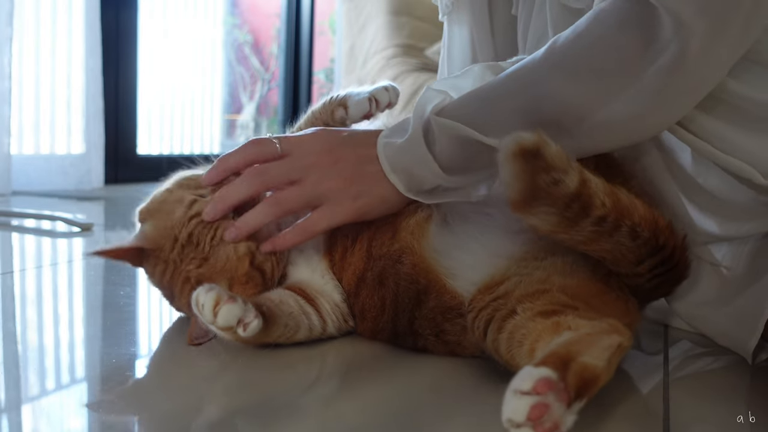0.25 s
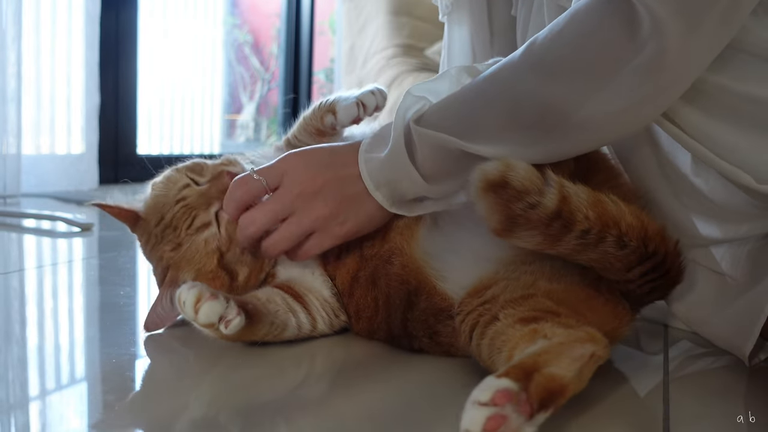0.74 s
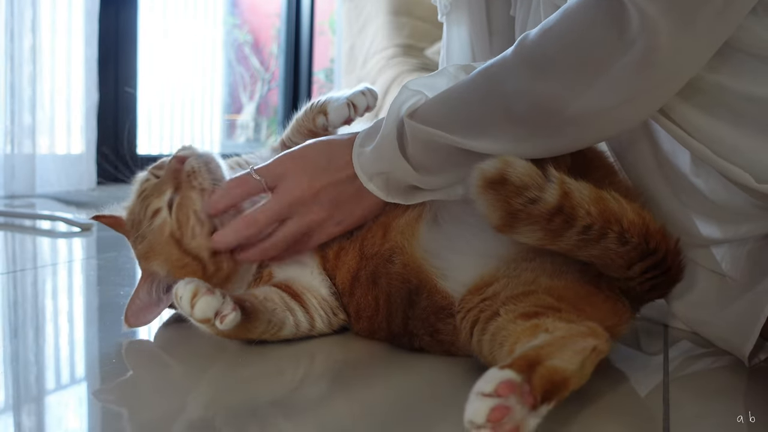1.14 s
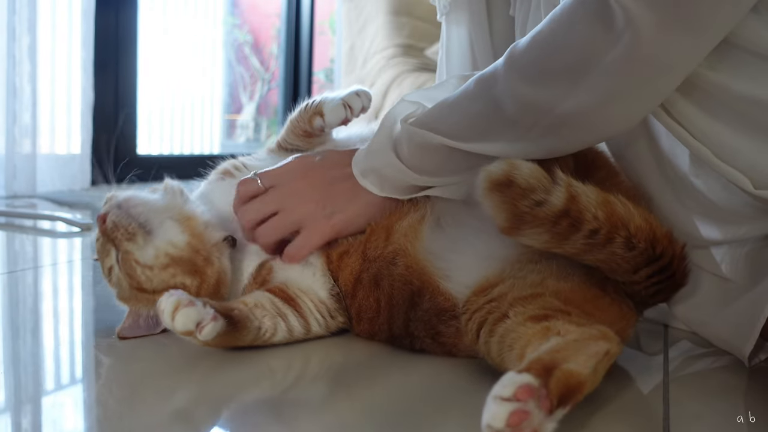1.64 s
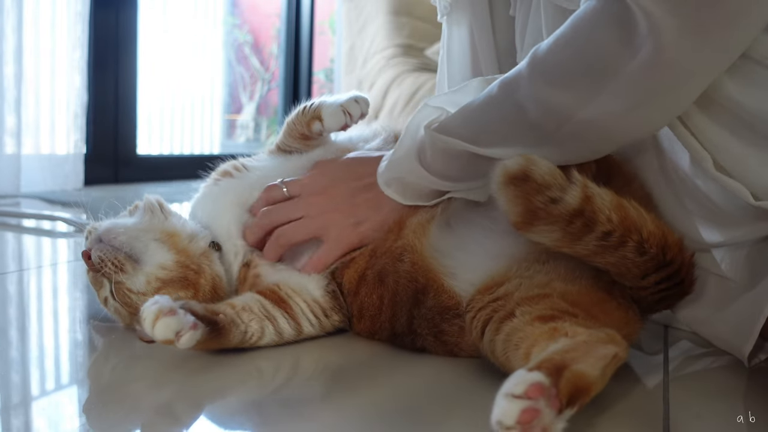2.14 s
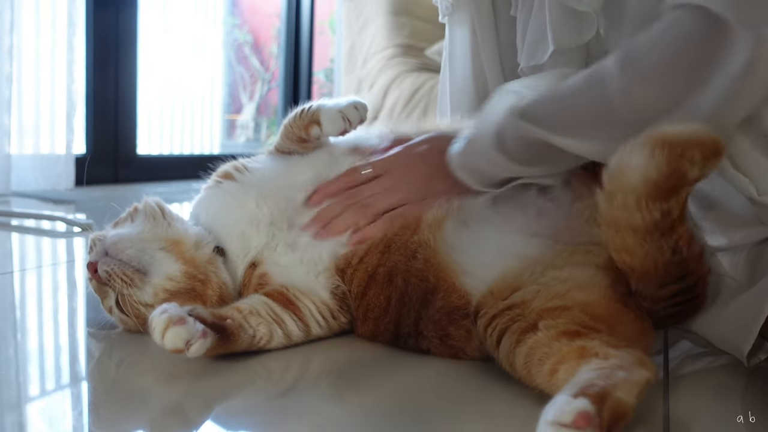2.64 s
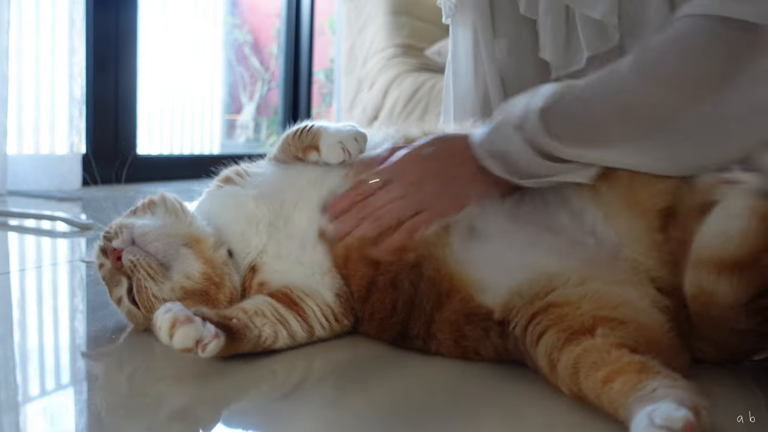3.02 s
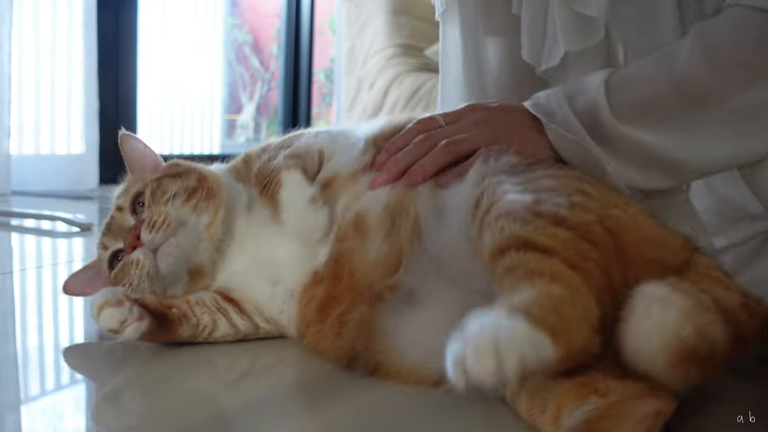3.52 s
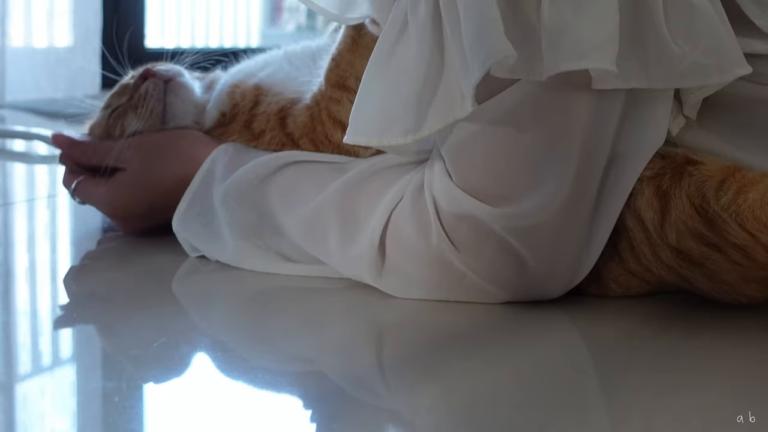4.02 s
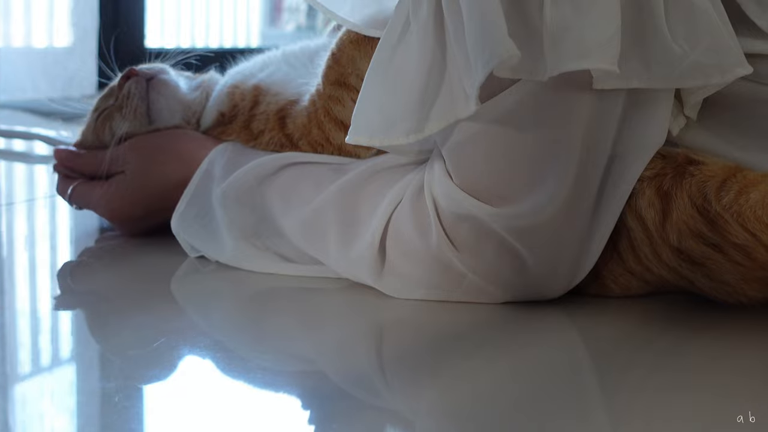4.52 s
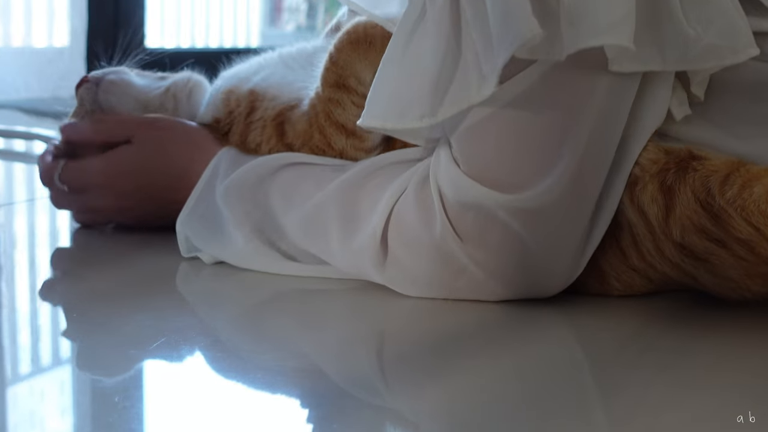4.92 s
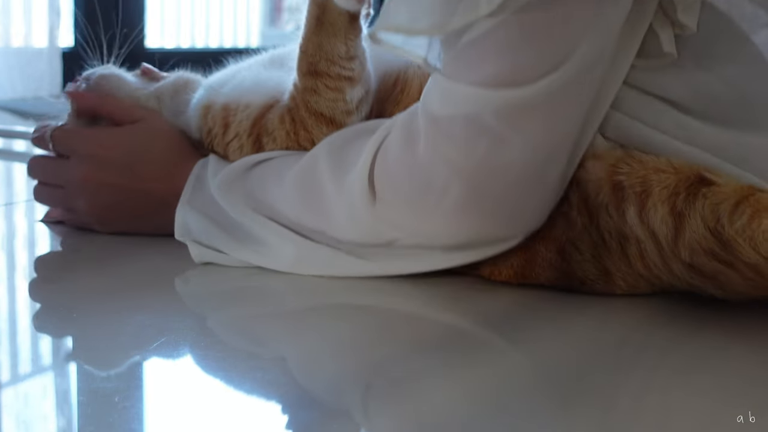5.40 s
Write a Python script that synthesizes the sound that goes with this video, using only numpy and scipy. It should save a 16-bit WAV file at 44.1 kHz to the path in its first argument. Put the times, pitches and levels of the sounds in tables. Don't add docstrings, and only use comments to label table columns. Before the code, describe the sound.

In a tiled room with a steady low motor hum and faint distant rumble, a cat lies very close to a stereo microphone. A soft purr is just fading at the start; rough, throaty bursts fluttering about thirty times a second follow at 0.5 and 1.0 seconds, with dry ticks and thin brushing hisses. A hand rubs the fur in soft, patchy rustles. From 1.4 to 1.85 a small collar bell jingles, brightest near 1.7, then dulls, while a longer strong purr begins at 1.6. Purring nearly vanishes after 2, returns fully at 2.7, and peaks in a short burst at 3.35 with sharp snuffles and crackles. At 3.7 the sound dips and a quieter background takes over. Sparse ticks and a tiny soft purr come around 4.6, then one airy nasal huff swells at 5.1 and fades by 5.4. Faint purr pulses close the clip at 5.5 to 5.65.

```python
import sys
import numpy as np
from scipy import signal
from scipy.fft import rfft, irfft, next_fast_len
from scipy.io import wavfile
from scipy.ndimage import uniform_filter1d

SR = 44100
rng = np.random.default_rng(int(sys.argv[2]) if len(sys.argv) > 2 else 0)


def volts_from_decibels(level):
    exponent = np.asarray(level, float) / 20
    return 10 ** exponent


def transcribe(signal):
    frames = np.atleast_2d(signal).T
    limited = np.clip(frames, -1, 1)
    pcm = np.round(limited * 32767).astype(np.int16)
    wavfile.write(sys.argv[1], SR, pcm)


N = 249605
CUT_S, CUT_DROP_DB = 3.692, -3


def rms_one(x):
    return x / np.sqrt(np.mean(x ** 2) + 1e-20)


def in_time(rows):
    s, *columns = np.transpose(rows)
    t = np.arange(N) / SR
    return [uniform_filter1d(np.interp(t, s, column), size=260) for column in columns]


def at_hz(points, hz):
    point_hz, value = np.transpose(points)
    return np.interp(np.log(hz), np.log(point_hz), value)


def drift(rate):
    r = np.exp(-80 * np.pi * rate / SR)
    chance = rng.standard_normal(N // 40 + 2002)
    slow = rms_one(signal.lfilter([1], [1, -2 * r, r * r], chance)[2000:])
    return np.interp(np.arange(N) / 40, np.arange(len(slow)), slow)


def resonate(x, modes):
    out = 0
    for k, (hz, width, db) in enumerate(modes):
        r = np.exp(-np.pi * width / SR)
        b = [(1 - r * r) / 2, 0, (r * r - 1) / 2]
        a = [1, -2 * r * np.cos(2 * np.pi * hz / SR), r * r]
        twice = signal.lfilter(b, a, signal.lfilter(b, a, x))
        out = out + (-1) ** k * volts_from_decibels(db) * twice
    return rms_one(out)


def strike(times, db, hz, t60):
    clicks = np.full(N, 1e-18)
    clicks[(np.asarray(times) * SR).astype(int)] = volts_from_decibels(db)
    r = volts_from_decibels(-60 / (t60 * SR))
    w = 2 * np.pi * hz / SR
    return signal.lfilter([0, np.sin(w)], [1, -2 * r * np.cos(w), r * r], clicks)


def peak_db(start, hold, db, rise, fall):
    t = np.arange(N) / SR
    below = np.maximum(rise * (start - t), fall * (t - start - hold))
    return db - np.maximum(0, below)


def lean(x, db):
    return np.array([x * volts_from_decibels(db / 2), x * volts_from_decibels(-db / 2)])


# (frequency [Hz], likeness [0-1])
LIKENESS = [(60, 0.89), (180, 0.94), (550, 0.45), (1650, 0.57), (4970, 0.62), (15000, 0.97)]


def banded_noise(spectrum, patchy_db, closeness):
    out, together = 0, drift(6.7)
    low_hz, high_hz = spectrum[0][0], 1.12 * spectrum[-1][0]
    edges = np.geomspace(low_hz, high_hz, int(3 * np.log2(high_hz / low_hz)) + 2)
    white = rng.standard_normal((2, 2, N))
    for k, (low, high) in enumerate(zip(edges, edges[1:])):
        band = signal.butter(2, [low, high], "band", fs=SR, output="sos")
        mid, side = signal.sosfilt(band, white[k % 2])
        hz = np.sqrt(low * high)
        alike = np.clip(at_hz(LIKENESS, hz) + closeness, 0, .99)
        flicker_db = patchy_db * (0.52 * together + drift(24.6))
        gain = volts_from_decibels(at_hz(spectrum, hz) + flicker_db)
        out = out + gain * (np.sqrt(1 + alike) * mid + np.sqrt(1 - alike) * side * [[1], [-1]])
    return rms_one(out)


# (frequency [Hz], level [dB per Hz])
ROOM = [(15, -74), (25, -24), (37, -30), (62, -8), (96, 1.5), (140, 0), (227, 1), (538, -18), (805, -20.5),
        (1540, -19), (1810, -25), (2240, -21), (4050, -40), (12900, -40), (15600, -41)]


def room_noise():
    return volts_from_decibels(-55.5) * banded_noise(ROOM, patchy_db=0.54, closeness=0.023)


def hum():
    level = np.sqrt(2) * volts_from_decibels(-54.5 + 0.16 * drift(21.0))
    return level * np.sin(2 * np.pi * 92.1 * np.arange(N) / SR + 0.14 * drift(1.7))


def tiled_room(x):
    t60_s, wall_cut_hz = 0.4, 1700
    size = next_fast_len(N + SR)
    turn = -2j * np.pi * np.arange(size // 2 + 1) / size
    dull = np.exp(-2 * np.pi * wall_cut_hz / SR)
    wall = (1 - dull) / (1 - dull * np.exp(turn))
    sides = np.zeros((2, len(turn)), complex)
    lags = (rng.uniform(0.014, 0.044, size=10) * SR).astype(int)
    for k, lag in enumerate(lags):
        loop = volts_from_decibels(-60 * lag / SR / t60_s) * wall * np.exp(turn * lag)
        sides[k % 2] += (-1) ** (k // 2) * loop / (1 - loop)
    return irfft(sides * rfft(x, size), size)[:, :N]


# (frequency [Hz], level [dB per Hz])
RUSTLE = [(350, -46), (600, -4), (756, -5.5), (990, -6.5), (1650, -14.5), (2180, -11.5), (2450, -11.5),
          (6000, -25), (7800, -44), (13200, -120)]


def rustling(fur_db):
    level_db = -68.5 + 0.68 * (fur_db - fur_db.mean())
    return volts_from_decibels(level_db) * banded_noise(RUSTLE, patchy_db=3.0, closeness=0.029)


# (time [s], vigour [dB])
STROKE = [(0, -82), (.47, -73), (.85, -77), (1.07, -73), (1.5, -82), (1.78, -71.5), (2, -73.5),
          (2.3, -73.5), (2.58, -81.5), (2.83, -70.5), (3.25, -77), (3.45, -72.5), (3.75, -78.5),
          (4.3, -85.5), (4.6, -83.5), (5, -78.5), (5.66, -77.5)]


def stroking():
    return in_time(STROKE)[0]


# (frequency [Hz], level [dB per Hz])
FUR = [(1760, -16), (3000, -25.5), (4320, -8.5), (4760, -13), (5200, -19.5), (7050, -13), (15600, -21)]


def rubbing(fur_db):
    return volts_from_decibels(fur_db + 1.0) * banded_noise(FUR, patchy_db=2.4, closeness=.04)


# (time [s], length [s], frequency [Hz], width [Hz], level [dB])
BRUSHES = [
    (0.309, 0.15, 4000, 700, -66.5),
    (0.318, 0.14, 6000, 700, -68),
    (0.499, 0.18, 7200, 700, -71.5),
    (.5, 0.043, 10340, 600, -66),
    (0.555, 0.15, 4000, 700, -66),
    (0.76, 0.071, 5250, 305, -66.5),
    (1.065, 0.092, 7200, 600, -70),
    (3.278, 0.091, 11500, 716, -71),
    (3.73, 0.1, 9700, 790, -70),
]


def brushes():
    out, t = 0, np.arange(N) / SR
    for s, length, hz, width, db in BRUSHES:
        onset = (t - s) / 0.0052
        taper = 0.58 * (s + length - t) / length
        stroke = np.clip(np.minimum(onset, taper), 0, 1)
        out = out + volts_from_decibels(db) * stroke * resonate(rng.standard_normal(N), [(hz, width, 0)])
    return out


# (time [s], peak level [dB], frequency [Hz])
TICKS = [(0.203, -58, 7010), (0.315, -66, 5870), (0.3994, -66, 6010), (0.503, -57, 7210),
         (0.939, -58, 5640), (1.3124, -59, 8100), (2.135, -58, 7120), (2.2594, -59, 5700),
         (3.4056, -52, 7500), (3.426, -50, 5900), (3.545, -52, 6230), (3.8794, -94, 6120),
         (4.544, -60, 7540), (4.6059, -63, 6540), (4.6379, -61, 6140), (4.686, -60, 6470),
         (4.712, -67.5, 6430), (5.6345, -56.5, 9220)]


def ticks():
    out = 0
    for s, db, hz in TICKS:
        out = out + strike([s], db, hz, 39.0 / hz)
        out = out + strike([s + 0.0021], db - 3.0, 1.5 * hz, 20.0 / hz)
    return out


# (time [s], peak level [dB], click level [dB], high ring level [dB])
JINGLE = [(1.4376, -56.5, -9, -5.5), (1.499, -59, -37, -27), (1.5074, -62, -7, -30),
          (1.5424, -39.5, -6, -30), (1.5594, -57.5, 11, -38), (1.598, -44, -5, -42),
          (1.6267, -47.5, -9, -38), (1.6691, -52, -18, -39), (1.6874, -46, -6, -15),
          (1.6921, -31, -13, -36), (1.6964, -59, 9, -36), (1.7094, -52.5, -4, 3), (1.7143, -66, 19, -17),
          (1.731, -39.5, 0, -14), (1.7548, -46, -18, -11), (1.7842, -50, -18, -21), (1.8057, -52, -23, -21),
          (1.8278, -51, -8, -27), (1.923, -57, -2, -27), (1.988, -62, -16, -20), (2.012, -64, -12, -20),
          (2.03, -63, -8, -20), (2.148, -64, -12, -20), (2.172, -64, -9, -20)]
# (frequency [Hz], level [dB], share of the ring time [ratio])
BELL_LOW = [(4865, -7, 1.0), (4915, -4, 0.22), (4735, -9, .2), (4790, -22, 3)]
# (frequency [Hz], width [Hz], level [dB])
BELL_CLICK = [(5200, 1140, 13), (6600, 1100, 8), (8400, 1800, -4)]


def bell():
    rolls_s, muffled_s = 1.69, 1.785
    t60_s, rolled_t60_s = 0.18, 0.057
    high_modes = [(11200, -5, -12), (11980, -14, -1.5)]
    low, splash = 0, np.zeros(N)
    for s, db, click_db, _ in JINGLE:
        t60 = t60_s if s < rolls_s else rolled_t60_s
        for hz, mode_db, share in BELL_LOW:
            low = low + strike([s], db + mode_db - 0.5, hz, max(share * t60, .01))
        splash[int(s * SR)] = volts_from_decibels(db + click_db)
        splash[int((s + .005) * SR)] = volts_from_decibels(db + click_db - 16.0)
    s, db, _, high_db = np.transpose(JINGLE)
    high = 0
    for hz, loss_db, rolled_loss_db in high_modes:
        mode_db = high_db + np.where(s < rolls_s, loss_db, rolled_loss_db)
        high = high + strike(s, db + mode_db, hz, 0.1)
    free = np.clip((muffled_s + 0.026 - np.arange(N) / SR) / 0.036, 0, 1)
    shell = resonate(splash + 1e-18, BELL_CLICK)
    shell = volts_from_decibels(9.5) * shell * splash.max() / np.abs(shell).max()
    band = signal.butter(4, [4350, 13000], "band", fs=SR, output="sos")
    return signal.sosfilt(band, low + free * high + shell)


# (time [s], level [dB])
HUFF = [
    (4.8, -95),
    (4.86, -77),
    (4.955, -61),
    (4.99, -52),
    (5.1, -48),
    (5.225, -50),
    (5.255, -55.5),
    (5.37, -68),
    (5.5, -103),
]
# (frequency [Hz], width [Hz], level [dB])
NOSE = [(574, 650, -10.5), (1150, 350, -13), (1850, 570, -3.5), (2297, 216, 8.5), (2585, 460, -0.5)]
# (frequency [Hz], width [Hz], level [dB])
NOSE_UPPER = [(4420, 1270, 2.5), (6050, 2100, -19), (6460, 1740, 1), (9400, 1760, -3), (11800, 1600, -12.5),
              (14600, 3000, -15.5)]


def huff():
    upper_db = -4
    level_db = in_time(HUFF)[0] + 1.5 * drift(29.0)
    low = resonate(volts_from_decibels(1.6 * drift(56.0)) * rng.standard_normal(N), NOSE)
    upper = resonate(volts_from_decibels(1.0 * drift(40.0)) * rng.standard_normal(N), NOSE_UPPER)
    apart = resonate(volts_from_decibels(1.0 * drift(40.0)) * rng.standard_normal(N), NOSE_UPPER)
    both = lean(low + volts_from_decibels(upper_db) * upper, 1.0)
    return volts_from_decibels(level_db) * (both + volts_from_decibels(upper_db - 17.0) * apart * [[1], [-1]])


# (peak time [s], level [dB], rise [dB per s], fall [dB per s])
SNUFFLES = [
    (0, -73, 43, 87),
    (.82, -76, 50, 148),
    (1.74, -64, 73, 51),
    (2.3, -77, 22, 39),
    (2.85, -70, 41, 26),
    (3.42, -61.5, 138, 97),
    (3.554, -64, 150, 132),
    (4.72, -79.5, 30, 33.5),
    (5.5, -77, 80, 90),
]
# (frequency [Hz], width [Hz], level [dB])
NOSTRIL = [(5730, 3000, -1), (7500, 2700, -32), (4000, 920, -5.5)]


def nostrils(place):
    levels = [peak_db(s, 0, db, rise, fall) for s, db, rise, fall in SNUFFLES]
    hiss_db = np.max(levels, axis=0).clip(-90)
    pulsed = 1 + .5 * np.cos(2 * np.pi * (place - .95))
    gusts = volts_from_decibels(1.1 * drift(60.0))
    return volts_from_decibels(hiss_db - 2.5) * resonate(pulsed * gusts * rng.standard_normal(N), NOSTRIL)


# (time [s], muzzle turned left [dB])
HEAD = [
    (0, 1),
    (.45, 2),
    (.62, -6),
    (1.12, -6),
    (1.3, -5),
    (1.75, 4.5),
    (3.1, 1.5),
    (3.49, -1.5),
    (3.8, 5),
]


def head_turn():
    return in_time(HEAD)[0]


# (first pulse [s], hold [s], effort [dB], flutter [Hz], release [dB per s])
BURSTS = [
    (-.008, 0.056, -48, 214.2, 191),
    (0.523, 0.099, -35, 223.6, 524),
    (.99, 0.091, -38, 208.5, 302),
    (1.598, 0.28, -33, 202.7, 217),
    (2.1, 0.26, -65.5, 190, 77),
    (2.715, 0.22, -34, 189.4, 201),
    (3.35, 0.067, -30, 196.5, 220),
    (4.65, 0.031, -48, 186.4, 164),
    (5.487, 0.034, -48.5, 190, 230),
    (5.626, .05, -59, 178, 200),
]


def purr_cycles():
    cycle_hz, cycle_s = 30, .0333
    start, hold = np.transpose(BURSTS)[:2]
    first = start + 0.0013
    last = first + cycle_s * np.ceil(hold / cycle_s)
    beats = np.ravel([first, last], "F")
    whole = np.maximum(np.round(np.diff(beats) * cycle_hz), 1)
    done = np.cumsum(np.r_[0, whole])
    cycles = np.interp(np.arange(N) / SR, beats, done) + .7 + 0.046 * drift(9.96)
    cycles = np.maximum.accumulate(np.maximum(cycles, 0))
    return cycles.astype(int), cycles % 1


def breathing():
    attack_db_per_s, sag_hz_per_s = 610, 49
    t = np.arange(N) / SR
    effort = volts_from_decibels(-68.5 + 1.5 * drift(3.8))
    for s, hold, db, _, fall in BURSTS:
        swell_db = -15 * np.clip(1 - (t - s) / 0.03, 0, 1)
        effort = effort + volts_from_decibels(peak_db(s, hold, db, attack_db_per_s, fall) + swell_db)
        effort = effort + volts_from_decibels(peak_db(s, hold, db - 20, attack_db_per_s, 57.5))
    s, hold, _, hz, _ = np.transpose(BURSTS)
    ends_s = np.ravel([s, s + hold], "F")
    ends_hz = np.ravel([hz, hz - sag_hz_per_s * hold], "F")
    return uniform_filter1d(20 * np.log10(effort), size=260), np.interp(t, ends_s, ends_hz)


# (time [s], overtone change [dB], rasp change [dB])
MOUTH = [(.6, 0.5, -2.5), (1.05, 0, -5.5), (1.72, 0.0, 0), (1.835, 4, 8), (1.9, -2, -1.5), (2.3, 2, 1),
         (2.69, 3, 3.5), (2.75, -4, -1), (3.36, -0.5, -1.5), (3.44, 6, 5.5), (3.56, 5, 0),
         (3.75, -4.5, -3.5), (5.66, -11, -4)]
# (frequency [Hz], width [Hz], level [dB])
THROAT = [(870, 61, -1), (963, 82, 1), (1145, 310, -3), (1464, 230, -5), (1620, 930, -21)]


def purr(cycle, place, muzzle_db):
    effort_db, flutter_hz = breathing()
    breathier_db = 0.51 * (-35 - effort_db)
    overtone_db, rasp_db = in_time(MOUTH)
    overtone_db = overtone_db - 13 + .5 * breathier_db
    rasp_db = rasp_db - 19.5 + breathier_db

    luck = rng.standard_normal((cycle[-1] + 1, 2))[cycle]
    turns = np.cumsum(flutter_hz * (1 + 0.025 * drift(33.7) + 0.025 * luck[:, 0])) / SR
    start = np.r_[0, np.flatnonzero(np.diff(cycle)) + 1]
    phase = 2 * np.pi * (turns - turns[start][cycle - cycle[0]])
    steady = .7 + np.maximum(flutter_hz - 200, 0) / 30
    swell = (steady + np.sin(np.pi * place ** 1.8) ** 2) / (steady + .4)
    swell = swell * volts_from_decibels(.6 * luck[:, 1] + 1.0 * drift(110.0))

    tone = resonate(swell * np.sin(phase), [(183, 380, 0.0)])
    tone = signal.sosfilt(signal.butter(2, 150, "high", fs=SR, output="sos"), tone)
    chest = resonate(swell * rng.standard_normal(N), [(190, 168, 0.0)])
    heave = resonate(swell * rng.standard_normal(N), [(46, 7.5, -12.0), (144.8, 22.4, 0.0)])
    breathy_octave = np.cos(2 * phase + 1.65) + 15.7 * rng.standard_normal(N)
    overtone = resonate(swell * breathy_octave, [(330.6, 42, 7.5), (394.6, 88, 3.5), (515.3, 84, 1.0)])
    flaps = np.exp(1.4 * np.cos(phase + 1.0))
    choke = .6 + np.exp(1.6 * (np.cos(2 * np.pi * (place - .98)) - 1))
    rasp = resonate(flaps * choke * volts_from_decibels(1.0 * drift(150.0)) * rng.standard_normal(N), THROAT)

    chest_side = volts_from_decibels(effort_db) * (0.85 * tone + 0.17 * chest + 0.09 * heave / steady)
    muzzle_side = volts_from_decibels(effort_db) * (volts_from_decibels(overtone_db) * overtone + volts_from_decibels(np.minimum(rasp_db, -2)) * rasp)
    chest_db = -0.8 + 0.63 * muzzle_db
    return lean(chest_side, chest_db) + lean(muzzle_side, muzzle_db)


def scene():
    behind = room_noise() + hum()
    behind = behind * volts_from_decibels(CUT_DROP_DB * (np.arange(N) > CUT_S * SR))
    fur_db = stroking()
    hand = rubbing(fur_db) + rustling(fur_db)
    cycle, place = purr_cycles()
    cat = purr(cycle, place, head_turn()) + lean(nostrils(place), 0.63) + huff()
    cat = cat + lean(bell(), 3.4) + lean(ticks() + brushes(), 0.19)
    thin = signal.sosfilt(signal.butter(1, 350, "high", fs=SR, output="sos"), cat.mean(0))
    return cat + volts_from_decibels(-15.5) * tiled_room(thin) + hand + behind


def band_limit(x):
    return signal.sosfilt(signal.butter(12, 15710, fs=SR, output="sos"), x)


def record(dry):
    since = np.arange(N) / SR - CUT_S
    join = 1 - .5 * np.exp(-np.maximum(since / 0.06, -since / 0.006))
    top = signal.ellip(12, .5, 70, 15680, fs=SR, output="sos")
    return band_limit(signal.sosfilt(top, dry * join))


dry = scene()
out = record(dry)
transcribe(out)
```